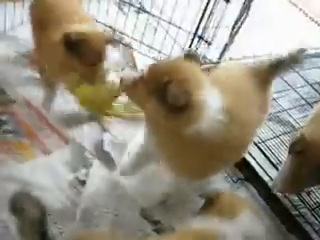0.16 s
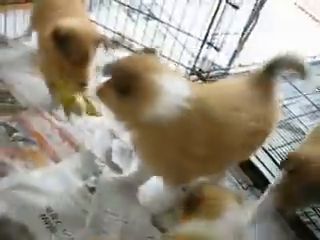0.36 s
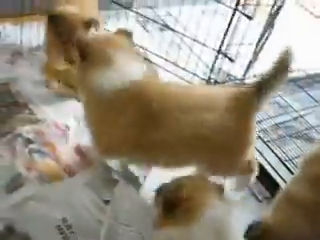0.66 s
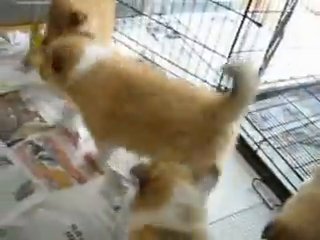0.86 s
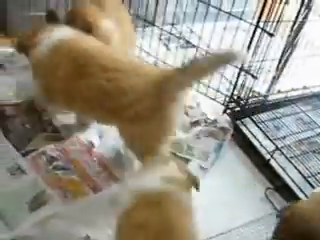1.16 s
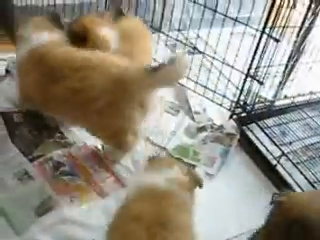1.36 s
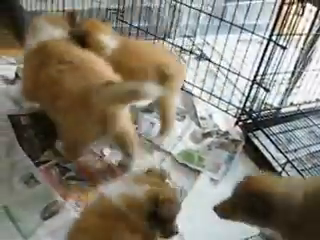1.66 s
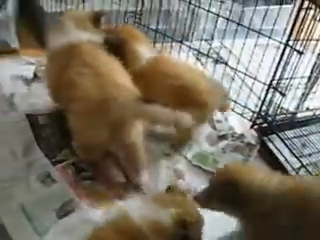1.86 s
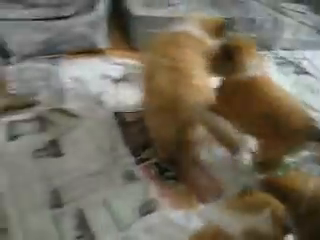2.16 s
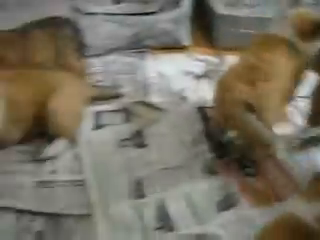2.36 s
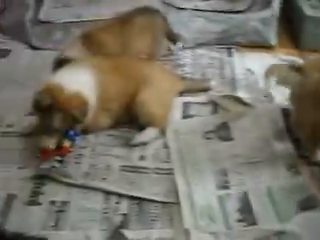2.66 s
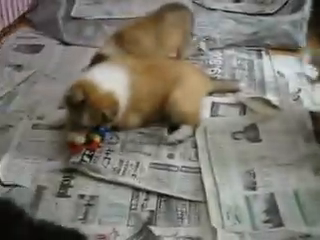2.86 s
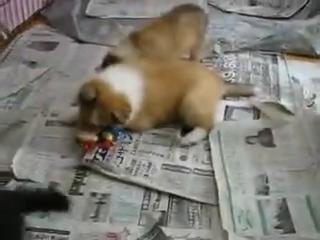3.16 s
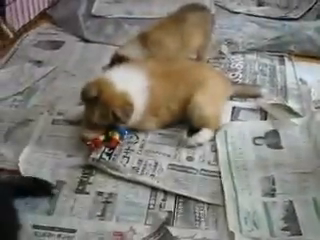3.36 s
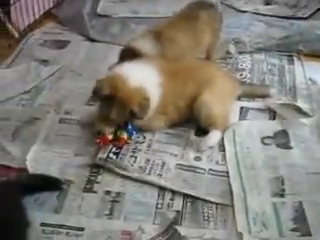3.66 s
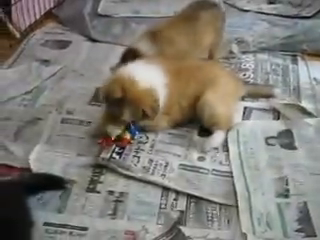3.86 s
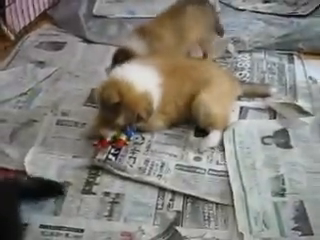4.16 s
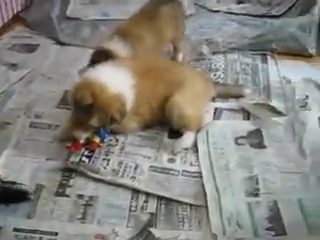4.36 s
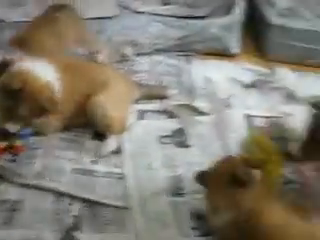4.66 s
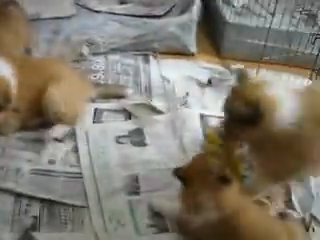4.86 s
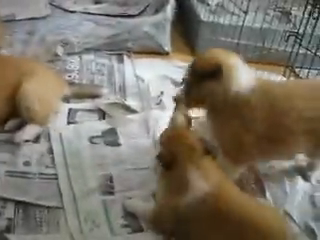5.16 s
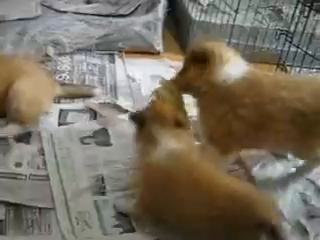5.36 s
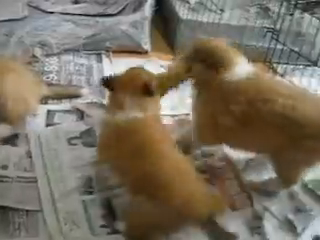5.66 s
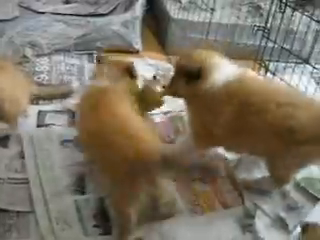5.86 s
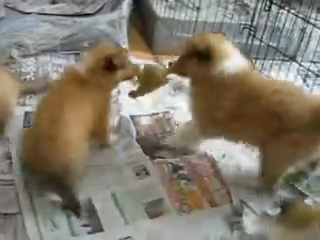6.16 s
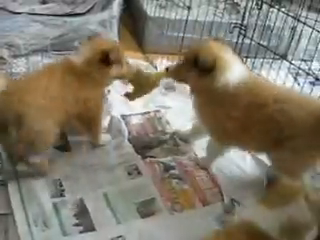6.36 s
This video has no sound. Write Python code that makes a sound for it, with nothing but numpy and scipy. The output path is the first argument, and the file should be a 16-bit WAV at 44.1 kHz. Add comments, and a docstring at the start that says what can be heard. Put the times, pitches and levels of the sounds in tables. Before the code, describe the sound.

Newspaper crackles continuously under puppy paws, heard close through a dull, slightly gritty camera microphone in a small room. Uneven footsteps crumple the sheets, creases snap, and padded feet bump the floor. Light wire ticks come early, a deep soft thud past the middle, and a burst of slaps later. After a quieter moment a squeezed toy gives a brief buzzy-edged squeak beside a barely audible grunt, then more rustling.

```python
"""A small room with a wire pen, where puppies tug at a toy and scuffle on sheets of newspaper.
The paper is a crowd of tiny ringing buckles over friction noise; it rustles, crumples, snaps and hums when rubbed.
Damped modes make the floor thuds, the two knocks on the wire and a humming tray; swept partials make one squeak.
A pup grunts softly in short rough tones.
A small camera close by samples at a low rate, so the squeak's upper partials fold down."""
import sys
import numpy as np
from scipy import signal
from scipy.fft import rfft, irfft
from scipy.io import wavfile
from scipy.ndimage import uniform_filter1d

SR = 44100
rng = np.random.default_rng(int(sys.argv[2]) if len(sys.argv) > 2 else 0)


def to_wav(sig):
    """Store sig (one row per channel, or 1-D mono) as 16-bit WAV at the path in sys.argv[1].

    Samples outside -1..1 are clipped; the rate is SR.
    """
    pcm = np.clip(np.atleast_2d(sig), -1, 1) * 32767
    pcm = np.round(pcm).astype(np.int16)
    wavfile.write(sys.argv[1], SR, pcm.T)  # frames by channels


N = 287091
TIME = np.arange(N) / SR

# how restless the litter is, as the level of the crisp shifting paper: (time [s], level [dB])
RESTLESSNESS = [(.08, -39.5), (.85, -41.5), (1.1, -42.5), (1.45, -38.5), (2.1, -43), (2.2, -39),
                (2.34, -47), (2.6, -40.5), (2.92, -44), (3.1, -38), (3.45, -42.5), (3.8, -44), (4.2, -39),
                (4.44, -45.5), (5.1, -45), (5.56, -42), (5.82, -50.5), (6.5, -43)]
# dull sliding of the sheets against their crisp crackle: (time [s], relative level [dB])
SLIDING_CURVE = [(.08, -10), (.85, 1), (1.1, -4.5), (2.2, -7), (3.25, -7), (3.45, 2.5), (3.9, -8),
                 (5.0, -2.5), (5.6, -8.5), (6.5, -3.5)]
# soft treading on the floor, before its gain: (time [s], level [dB])
TREAD_CURVE = [(.08, -42.5), (.4, -46), (.8, -40), (1.15, -48.5), (1.85, -45), (2.9, -50.5), (3.5, -47),
               (5.6, -53.5), (6.05, -50), (6.5, -53)]
# a paw crumples the paper, before the layer gains:
# (time of the height [s], level [dB], dying time [s], dull part against crisp part [dB])
PAW_STEPS = [(.157, -33.5, 0.021, -2), (.216, -33, 0.012, -8.5), (0.286, -37, 0.017, -1.5),
             (0.404, -37, 0.017, -5.5), (0.545, -33.5, 0.017, -6.5), (.635, -39, 0.047, -5.5),
             (.711, -29, 0.012, -17), (.8, -38, 0.026, -6), (0.964, -27.5, 0.018, 1),
             (1.298, -33.5, 0.025, -6), (1.495, -33.5, 0.021, -6), (1.535, -23.5, 0.02, -11),
             (1.594, -32, 0.018, -5), (1.647, -30, 0.019, -11), (1.835, -31.5, 0.076, -11),
             (1.96, -37, 0.047, -8.5), (2.264, -36.5, 0.013, -10), (2.462, -35.5, 0.034, -7.5),
             (2.7, -36.5, 0.021, -13.5), (2.962, -34, 0.0099, -1.5), (3.117, -31.5, .021, -1.5),
             (3.324, -28, 0.0083, -12), (3.478, -36, 0.083, -2), (3.591, -31, 0.026, -0.5),
             (3.964, -32.5, 0.038, -9), (4.246, -22.5, 0.011, -14), (4.371, -39.5, 0.024, -1),
             (4.523, -33.5, 0.018, -9), (4.611, -27.5, 0.0078, -10), (4.853, -34, .011, -7),
             (5.147, -44, 0.013, -7), (5.493, -40, 0.018, -2.5), (5.672, -38, 0.058, -10),
             (5.861, -38, 0.0076, -6), (5.932, -31, 0.022, -5), (6.016, -30, 0.022, -4),
             (6.118, -31, 0.064, -7), (6.475, -37.5, 0.055, -5.5)]
# a paw slaps down flat, before the layer gains: (time [s], level [dB], dull part against crisp part [dB])
PAW_SLAPS = [(0.1408, -31.5, -12), (.923, -32.5, 2), (.943, -33, 2.5), (3.305, -32.5, -3.5),
             (3.559, -33, -3), (4.174, -32.5, -6), (4.557, -25.5, -15), (4.604, -24, -10),
             (5.202, -38.5, -5), (6.008, -29, -5), (6.085, -29, -16), (6.392, -37.5, -4)]
# a big crease snaps: (time [s], dry peak level [dB], pitch [Hz])
CREASE_SNAPS = [(.1567, -10, 3280), (0.7099, -9, 3700), (1.2058, -14.5, 4080), (1.2927, -17, 3400),
                (1.4234, -17.5, 4050), (1.4615, -19, 2300), (1.6292, -9, 2800), (1.6748, -11, 2980),
                (1.903, -14.5, 4000), (2.2512, -19, 3170), (2.439, -17, 3600), (2.5105, -15.5, 3000),
                (3.2627, -16.5, 3900), (3.561, -15.5, 2980), (3.577, -6.5, 4200), (3.6587, -15, 3590),
                (3.9588, -9, 2970), (4.0041, -7.5, 3560), (4.0291, -14.5, 2550), (4.1762, -17, 3800),
                (4.246, -9, 3100), (4.3133, -10.5, 4360), (4.9302, -18.5, 2980), (4.985, -15.5, 4420),
                (6.085, -8.5, 4000)]
# a paw or a rump lands: (time [s], drive level [dB], hardness of the contact as a low-pass cutoff [Hz])
LANDINGS = [(.508, -30.5, 220), (.534, -27.5, 160), (0.665, -29.5, 350), (.703, -28, 200), (.745, -28, 100),
            (0.805, -32, 200), (.957, -34, 160), (.995, -31, 89.5), (1.286, -29.5, 170), (1.589, -31, 300),
            (1.832, -29, 85), (1.95, -30, 240), (2.462, -32.5, 172), (3.095, -30.5, 132), (3.481, -43, 450),
            (3.579, -38, 504), (3.602, -13, 68), (4.241, -36, 170), (4.562, -31, 180), (4.606, -23.5, 150)]
# resonances of the floor under the paper: (frequency [Hz], relative level [dB], t60 [s])
FLOOR_RESONANCES = [(71.2, -2.5, 0.23), (127, -0.5, 0.15), (152, -1, 0.084), (200, -6, 0.32),
                    (240, -6, 0.2), (330, -1.5, 0.029)]
# the wire of the pen is knocked: (time [s], drive level [dB])
PEN_KNOCKS = [(.679, -30.5), (1.261, -34.5)]
# ring of the wire: (frequency [Hz], relative level [dB], t60 [s])
WIRE_RESONANCES = [(2940, 0, .045), (3140, 2.5, 0.073), (3400, -2, 0.063), (5000, 3, .05),
                   (5170, -2, 0.054)]
# a pad rubs along the sheet, which hums at one pitch: (time [s], level [dB], pitch [Hz])
PAD_RUBS = [(.962, -36.5, 660), (3.125, -31, 832)]
# a pup grunts softly: (time [s], level [dB], pitch [Hz])
PUP_GRUNTS = [(3.245, -41, 243), (5.36, -43.5, 198)]
# the reed of the squeezed toy, before its gain: (time [s], pitch [Hz], level [dB], buzz [0-1])
REED_GLIDE = [(5.238, 885, -52, 0), (5.26, 1025, -33, .1), (5.271, 1165, -28, 1), (5.298, 1197, -28, .85),
              (5.32, 1205, -28, .35), (5.418, 1200, -30, 0), (5.452, 1180, -32.5, 1),
              (5.466, 1105, -36.5, .7), (5.483, 1020, -56, 0)]
# partials of the reed: (multiple of the pitch [-], level when smooth [dB], level when buzzing [dB])
REED_PARTIALS = [(1, 1.5, 2.5), (2, -4, -4), (3, -12, 2.5), (4, -14, 2), (5, -11, -9), (6, -35, -23),
                 (7, -10, -20), (8, -12.5, -12)]
# colour of the crisp paper: (frequency [Hz], relative level [dB])
CRISP_COLOUR = [(500, -22.5), (1200, -17), (2000, -3), (2700, -1.5), (3900, -0.5), (4800, -3), (5500, -3.5)]
# colour of the dull paper: (frequency [Hz], relative level [dB])
DULL_COLOUR = [(200, -3.5), (330, -2), (480, -5), (700, 1.5), (1200, 1.5), (1700, -2), (2600, -7),
               (5000, -26.5)]
# colour of the treading: (frequency [Hz], relative level [dB])
RUMBLE_COLOUR = [(20, -10.5), (33, -0.5), (48, -11.5), (70, 0), (95, -10.5), (125, -5.5), (200, -9.5),
                 (330, -14), (600, -19)]


def from_db(db):
    """Decibels to gain."""
    return 10 ** (np.asarray(db) / 20)


def rms_one(x):
    """Scale to unit rms."""
    return x / np.sqrt(np.mean(x ** 2) + 1e-20)


def in_time(rows):
    """Each column of a curve at every sample."""
    s, *columns = np.transpose(rows)
    return [np.interp(TIME, s, column) for column in columns]


def low_pass(x, hz, order=2):
    """Causal Butterworth low-pass."""
    return signal.sosfilt(signal.butter(order, hz, fs=SR, output="sos"), x + 1e-18)


def coloured(x, spectrum):
    """Give a dense stream a smooth spectrum that closes beyond both its end points; rms 1."""
    hz, db = np.transpose(spectrum)
    f = np.maximum(np.fft.rfftfreq(N, 1 / SR), 1)
    gain = from_db(np.interp(np.log(f), np.log(hz), db))
    gain /= 1 + (f / (1.1 * hz[-1])) ** 24   # steep top
    gain /= 1 + (.6 * hz[0] / f) ** 4        # gentler bottom
    return rms_one(irfft(rfft(x) * gain, N))


def ring(clicks, hz, t60):
    """A damped resonance: a unit click sets a sine of height 1 ringing."""
    r, w = np.exp(-np.log(1000) / (t60 * SR)), 2 * np.pi * hz / SR
    return signal.lfilter([0, r * np.sin(w)], [1, -2 * r * np.cos(w), r * r], clicks + 1e-18)


def add(track, s, sound):
    """Mix a sound into a track from a given time."""
    start = round(s * SR)
    track[start:start + len(sound)] += sound[:N - start]


def swell(s, rise_s, fall_s):
    """An envelope that grows to 1 at a given time and dies away."""
    return np.exp(-np.minimum(np.maximum((s - TIME) / rise_s, (TIME - s) / fall_s), 20))


def random_clicks(per_s, spread_db, largest):
    """Sparse clicks of either sign; their size in dB is exponential, capped at a multiple of the spread."""
    sizes = from_db(spread_db * np.minimum(rng.exponential(1, N), largest)) * rng.choice([-1, 1], N)
    return sizes * (rng.random(N) < per_s / SR)


def crackle(spectrum, per_s, spread_db, t60, friction, clump_db, even_s, count=14):
    """Tiny buckles of uneven size, each ringing one patch of the sheet, over friction; rms near 1."""
    clicks = random_clicks(per_s, spread_db, largest=4)
    patch = rng.integers(0, count, N)
    pitches = np.linspace(400, 5400, count)
    rings = sum(ring(clicks * (patch == k), hz, t60) for k, hz in enumerate(pitches))
    grains = coloured(rings, spectrum)
    # one buckle sets off its neighbours, so they come in clumps of a few milliseconds
    clumps = from_db(clump_db * rms_one(low_pass(rng.standard_normal(N), 70)))
    paper = clumps * (grains + friction * coloured(rng.standard_normal(N), spectrum))
    # the paw's push, not chance, sets the energy released over a longer stretch
    return paper / np.sqrt(uniform_filter1d(paper ** 2, int(even_s * SR)) + 1e-9)


def hums(rows, half_length_s, jitter):
    """Short tones, roughened by a random pitch waver, that fade in and out."""
    waver = 1 + jitter * rms_one(low_pass(rng.standard_normal(N), 120))
    phase = 2 * np.pi * np.cumsum(waver) / SR
    out = np.zeros(N)
    for s, db, hz in rows:
        fade = np.exp(-np.minimum(((TIME - s) / half_length_s) ** 2, 20))
        out += from_db(db) * fade * np.sin(hz * phase)
    return out


def rustle():
    """Sheets slide and tick under the moving litter: crisp crackle over duller sliding."""
    (level_db,), (sliding_db,) = in_time(RESTLESSNESS), in_time(SLIDING_CURVE)
    crisp = crackle(CRISP_COLOUR, per_s=1200, spread_db=4.0, t60=.003, friction=0.77, clump_db=2.0, even_s=0.11)
    dull = crackle(DULL_COLOUR, per_s=1500, spread_db=1.0, t60=0.0045, friction=.8, clump_db=2.0, even_s=0.091)
    return from_db(level_db) * (crisp + from_db(sliding_db) * dull)


def ticks(per_s=22, tick_db=9, spread_db=4.0, tick_hz=3500, t60=.0009):
    """Small creases flip at random, each a tiny damped ring, louder while the litter is restless."""
    level_db, = in_time(RESTLESSNESS)
    clicks = from_db(level_db + tick_db) * random_clicks(per_s, spread_db, largest=3)
    return low_pass(ring(clicks, tick_hz, t60), 5500, order=4)


def tread(gain_db=1.0):
    """Soft treading presses on the floor: low coloured noise that follows the treading level."""
    level_db, = in_time(TREAD_CURVE)
    return from_db(level_db + gain_db) * coloured(rng.standard_normal(N), RUMBLE_COLOUR)


def scuffs(crisp_gain_db=4.0, dull_gain_db=2.5, swell_share=0.69, slap_rise_s=0.0023, slap_fall_s=0.019,
           drag_db=-17, drag_dull_db=-3, drag_lead_s=0.059, drag_lag_s=0.037):
    """Each step swells and dies as a burst of buckles; a slap starts almost at once; both drag the sheet."""
    # a step swells in a share of its dying time
    steps = [(s, db, swell_share * dying_s, dying_s, dull_db) for s, db, dying_s, dull_db in PAW_STEPS]
    slaps = [(s, db, slap_rise_s, slap_fall_s, dull_db) for s, db, dull_db in PAW_SLAPS]
    crisp_power, dull_power = np.zeros((2, N))
    for s, db, rise_s, fall_s, dull_db in steps + slaps:
        push = from_db(db) * swell(s, rise_s, fall_s)
        # the sheet around the paw is dragged before and after
        drag = from_db(db + drag_db) * swell(s, drag_lead_s, drag_lag_s)
        crisp_power += push ** 2 + drag ** 2
        dull_power += (push * from_db(dull_db)) ** 2 + (drag * from_db(drag_dull_db)) ** 2
    crisp = crackle(CRISP_COLOUR, per_s=3000, spread_db=1.5, t60=0.0045, friction=0.36, clump_db=2.0, even_s=0.013)
    dull = crackle(DULL_COLOUR, per_s=2200, spread_db=1.0, t60=0.0046, friction=0.28, clump_db=1.5, even_s=0.028)
    crisp_layer = from_db(crisp_gain_db) * np.sqrt(crisp_power) * crisp
    dull_layer = from_db(dull_gain_db) * np.sqrt(dull_power) * dull
    return crisp_layer + dull_layer


def snaps(t60=0.0016, flutter_db=-29, flutter_s=0.0038, sheet_hz=1400, sheet_db=-11, sheet_t60=0.0016):
    """A crease flips over: one sharp, damped ring, a duller flap and a short flutter of the sheet."""
    out, t = np.zeros(N), TIME[:SR // 25]
    for s, db, hz in CREASE_SNAPS:
        flutter = from_db(flutter_db) * rng.standard_normal(len(t)) * np.exp(-t / flutter_s)
        kick = signal.unit_impulse(len(t)) + flutter
        motion = ring(kick, hz, t60) + from_db(sheet_db) * ring(kick, sheet_hz, sheet_t60)
        snap = np.diff(low_pass(motion, 5500, order=4))   # a small patch radiates little bass
        add(out, s, from_db(db) * snap / np.abs(snap).max())
    return out


def thuds(scatter_db=2.0, lowest_hz=50, pad_db=-13, pad_s=.03, pad_hz=370):
    """Soft pads push the floor's modes and puff as they flatten; the softer the contact, the duller both are."""
    out, click, t = np.zeros(N), signal.unit_impulse(SR // 2), TIME[:SR // 2]
    for s, db, hard_hz in LANDINGS:
        # each landing excites the modes a little differently
        strengths = from_db(scatter_db * rng.standard_normal(len(FLOOR_RESONANCES)))
        floor = np.zeros(len(t))
        for k, (hz, mode_db, t60) in enumerate(FLOOR_RESONANCES):
            floor += (-1) ** k * strengths[k] * from_db(mode_db) * ring(click, hz, t60)
        breath = rms_one(ring(rng.standard_normal(len(t)), pad_hz, .01))
        puff = from_db(pad_db) * breath * np.exp(-t / pad_s)
        add(out, s, from_db(db) * (low_pass(floor, hard_hz, order=3) + low_pass(puff, hard_hz, order=1)))
    return signal.sosfilt(signal.butter(2, lowest_hz, "high", fs=SR, output="sos"), out + 1e-18)


def wire(rattle_db=-27, rattle_s=0.05):
    """The pen's bars ring briefly as damped modes and rattle against each other as decaying noise."""
    clicks, t = np.zeros(N), TIME[:SR // 10]
    for s, db in PEN_KNOCKS:
        rattle = from_db(rattle_db) * rng.standard_normal(len(t)) * np.exp(-t / rattle_s)
        add(clicks, s, from_db(db) * (signal.unit_impulse(len(t)) + rattle))
    return sum(from_db(db) * ring(clicks, hz, t60) for hz, db, t60 in WIRE_RESONANCES)


def rubs():
    """A pad rubs along the sheet, which hums briefly at one pitch."""
    return hums(PAD_RUBS, half_length_s=0.022, jitter=.03)


def grunts():
    """A pup's soft grunt: a short low tone with a rough pitch."""
    return hums(PUP_GRUNTS, half_length_s=0.032, jitter=.08)


def tray(s=4.615, hz=126, db=-33, t60=0.57):
    """One landing leaves the pen's tray humming in a single damped mode."""
    click = np.zeros(N)
    add(click, s, from_db([db]))
    return ring(click, hz, t60)


def squeak(jitter=0.00091, gain_db=1.2, full_db=-34, mellowing=.7):
    """Air pressure pulls the reed up to its own pitch; it buzzes on the way in and out."""
    hz, db, buzz = in_time(REED_GLIDE)
    buzz = np.clip(buzz, 0, 1)
    waver = jitter * rms_one(low_pass(rng.standard_normal(N), 150))
    phase = 2 * np.pi * np.cumsum(hz * (1 + waver)) / SR
    soft_db = mellowing * np.minimum(db - full_db, 0)   # a weakly blown reed swings almost as a sine
    tone = np.zeros(N)
    for k, smooth_db, buzz_db in REED_PARTIALS:
        bite = buzz ** max(k - 2, 1)   # higher partials need a stronger buzz
        partial_db = smooth_db + bite * (buzz_db - smooth_db) + soft_db * (k > 1)
        tone += from_db(partial_db) * np.sin(round(k) * phase)
    sounding = (TIME > REED_GLIDE[0][0]) * (TIME < REED_GLIDE[-1][0])
    return from_db(db + gain_db) * tone * sounding


def room(x, t60=0.42, first_echo_s=0.0018):
    """A short, dense tail from the near walls: decaying noise of unit energy."""
    t = TIME[:SR // 2]
    tail = rng.standard_normal(len(t)) * np.exp(-np.log(1000) * t / t60) * (t > first_echo_s)
    return signal.fftconvolve(x, tail / np.linalg.norm(tail))[:N]


def scene(paper_room_db=-13.5, toy_room_db=-22):
    """Paper, wire and toy in the room; grunts, treading, thuds and tray stay dry."""
    paper_and_wire = rustle() + ticks() + scuffs() + snaps() + wire() + rubs()
    toy = squeak()
    reverb = room(from_db(paper_room_db) * paper_and_wire + from_db(toy_room_db) * toy)
    floor = tread() + thuds() + tray()
    return (paper_and_wire + toy + grunts() + reverb + floor)[None]


def record(dry):
    """The camera starts a moment late and keeps every fourth sample unfiltered, so high partials fold down."""
    kept = (np.arange(N) % 4 == 0) * (TIME > .079)
    sampled = 4 * dry * kept   # 4 makes up for the dropped samples
    smooth = signal.fftconvolve(sampled, signal.firwin(41, 5450, fs=SR)[None], "same")
    # 50 dB down from 7300 Hz up
    return signal.sosfilt(signal.cheby2(16, 50, 7300, fs=SR, output="sos"), smooth)


dry = scene()
out = record(dry)
to_wav(out)
```